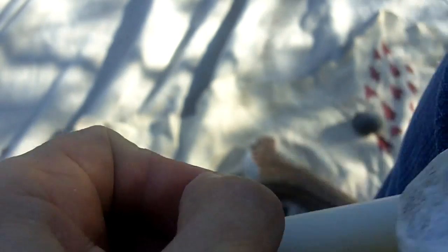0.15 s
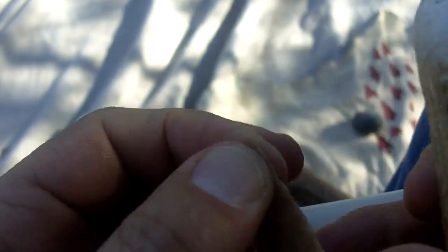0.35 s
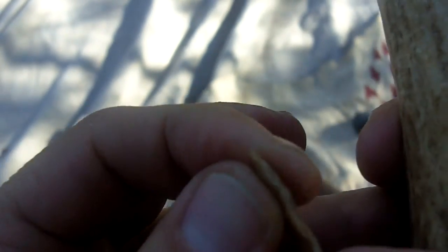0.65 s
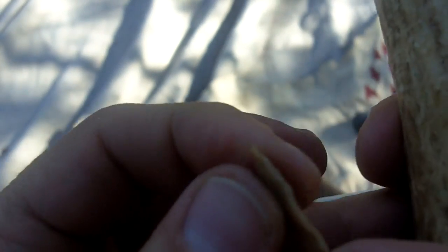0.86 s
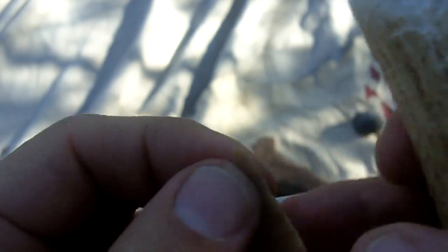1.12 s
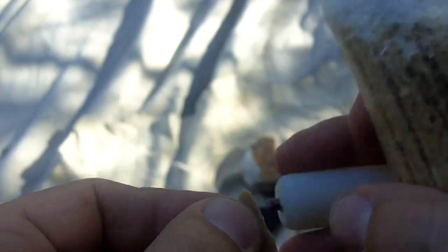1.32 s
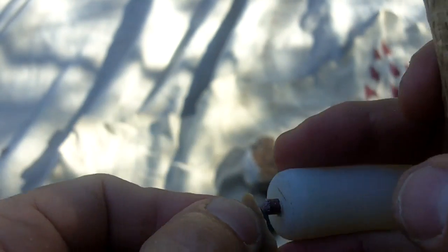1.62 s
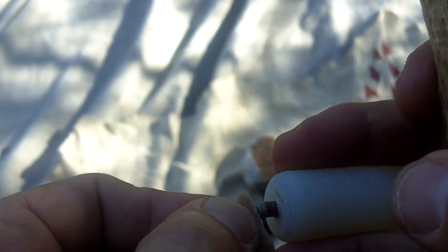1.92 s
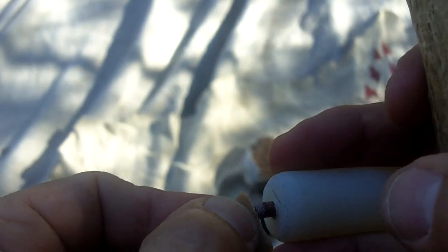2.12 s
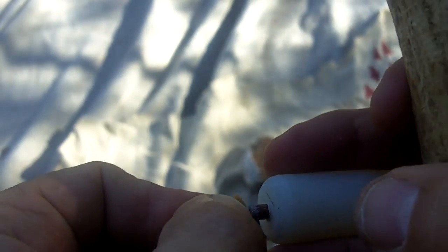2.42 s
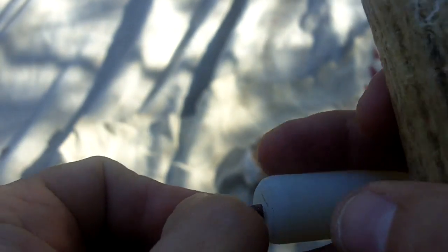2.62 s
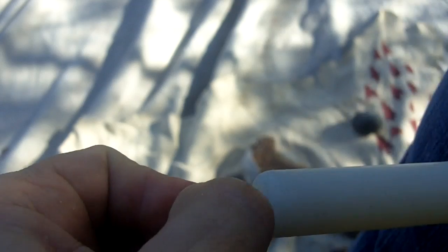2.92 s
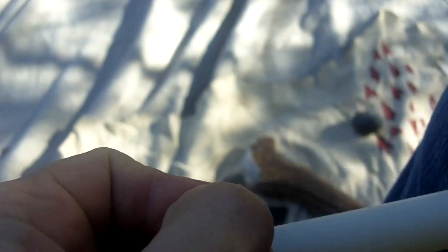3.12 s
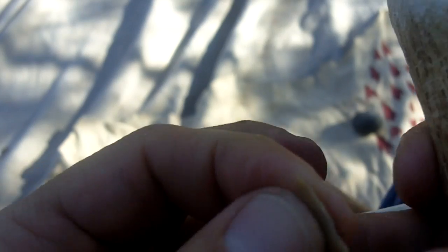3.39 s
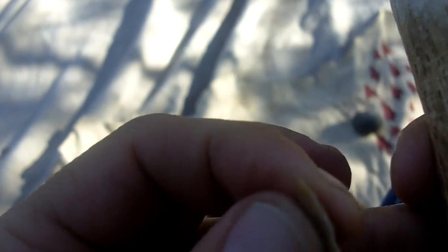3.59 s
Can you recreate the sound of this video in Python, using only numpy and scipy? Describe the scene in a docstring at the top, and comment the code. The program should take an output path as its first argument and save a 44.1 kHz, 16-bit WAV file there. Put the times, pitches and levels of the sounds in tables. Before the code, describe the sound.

A hard, dry knapping crack, then distant birdsong and wind buffeting, then a second, louder crack

```python
"""Flint knapping in a yard, under light wind that buffets the microphone: low-passed noise swelling in gusts.
An antler billet hits a punch set on a stone edge: noise cracks, damped sines ring, walls and trees answer.
Small birds then sing at a distance as gliding sines with a diffuse tail, and the gusts grow.
A second blow comes near the end; the billet rebounds once and a loose flake ticks as it lands.
The blows overload the recorder, whose gain dips and recovers."""
import sys
import numpy as np
from scipy import signal
from scipy.fft import rfft, irfft, next_fast_len
from scipy.io import wavfile
from scipy.ndimage import map_coordinates

SR = 44100
rng = np.random.default_rng(int(sys.argv[2]) if len(sys.argv) > 2 else 0)


def store_wav(level_fs):
    """Save 16-bit WAV to argv[1]."""
    pcm = np.round(np.clip(np.atleast_2d(level_fs), -1, 1) * 32767)
    wavfile.write(sys.argv[1], SR, pcm.T.astype(np.int16))


N = 165375
T = np.arange(N) / SR  # time [s]


def amp(db):
    """Amplitude ratio: 20 dB for each factor of ten."""
    return 10 ** (np.asarray(db) / 20)


def unit(x):
    """Normalisation: equal mean power, rms 1 over all channels."""
    return x / np.sqrt(np.mean(x ** 2) + 1e-20)


def along(points, hz):
    """Logarithmic frequency scale: (frequency, value) points are joined by lines on it."""
    f, v = np.transpose(points)
    return np.interp(np.log(hz + 1), np.log(f + 1), v)


def filtered(x, response):
    """Linear filtering: the spectrum is multiplied by a response of frequency."""
    size = next_fast_len(N + 8192)  # zero padding limits wrap-around
    spectrum = rfft(x, size) * response(np.fft.rfftfreq(size, 1 / SR))
    return irfft(spectrum, size)[..., :N]


def noise(spectrum, alike):
    """Interchannel coherence: independent mid and side noises, coloured and mixed to stereo of rms 1."""
    def mid_side_gains(hz):
        # half the angle whose cosine is the left-right correlation
        turn = np.arccos(np.clip(along(alike, hz), -1, 1)) / 2
        return amp(along(spectrum, hz)) * [np.cos(turn), np.sin(turn)]

    mid, side = filtered(rng.standard_normal((2, N)), mid_side_gains)
    return unit(np.array([mid + side, mid - side]))


def wobble(rate):
    """Slow random modulation: a smooth curve through random knots, rate of them a second."""
    knots = rng.standard_normal(int(N * rate / SR) + 4)
    return map_coordinates(knots, [T * rate])


def burst(start, attack, t60):
    """Exponential decay: a quick rise, then a fall of 60 dB in each t60."""
    t = np.maximum(T - start, 0)
    decay = np.exp(-np.minimum(np.log(1000) * t / t60, 50))
    return (1 - np.exp(-t / attack)) * decay


def pan(db):
    """Interchannel level difference: left minus right in dB, split evenly between the two."""
    return amp(np.array([[db], [-db]]) / 2)


def outdoor_air():
    """Ambient noise: steady broadband air over a distant low rumble."""
    # spectra of the air and of the distant rumble: (frequency [Hz], relative level [dB])
    air_spectrum = [(120, -36), (200, -3), (397, -3.5), (613, -2.5), (721, -5), (833, -3.5), (1110, -5.5),
                    (1220, -7.5), (1910, -11.5), (3870, -16.5), (15000, -23.5)]
    low_spectrum = [(20, 0), (60, -7), (130, -4), (220, -10.5), (500, -41)]
    # coherence of the diffuse field: (frequency [Hz], left-right correlation)
    air_coherence = [(60, 0.81), (180, 0.71), (550, 0.71), (1650, 0.85), (4970, 0.86), (15000, 1)]
    air_db, low_db = -54, -57
    air = amp(air_db) * noise(air_spectrum, air_coherence)
    return air + amp(low_db) * noise(low_spectrum, air_coherence)


def wind():
    """Turbulent pressure at the microphone: low-frequency noise whose level follows the gusts."""
    # course of the gusts: (time [s], buffeting level before the raise [dB])
    gust_course = [(.05, -57), (.4, -57), (.57, -51.5), (1.05, -62), (1.14, -42), (1.38, -54),
                   (1.585, -55.5), (1.63, -39), (1.72, -38), (1.8, -38), (1.86, -35), (2.0, -38.5),
                   (2.11, -29), (2.2, -38), (2.3, -34), (2.36, -40.5), (2.43, -37), (2.52, -38),
                   (2.56, -28.5), (2.63, -40), (2.8, -30), (3.0, -44), (3.17, -41), (3.26, -50),
                   (3.32, -36.5), (3.55, -37), (3.72, -43.5)]
    # spectrum of the buffeting: (frequency [Hz], relative level [dB])
    rumble_spectrum = [(12, -6.5), (25, 1), (40, -0.5), (60, -8.5), (100, -20.5), (160, -31.5), (300, -43),
                       (800, -71.5)]
    # coherence of the buffeting: (frequency [Hz], left-right correlation)
    wind_coherence = [(40, .62)]
    raise_db, flutter_db = 1.5, 1.8
    gust_db = np.interp(T, *np.transpose(gust_course)) + raise_db + flutter_db * wobble(12)
    return amp(gust_db) * pan(1.5) * noise(rumble_spectrum, wind_coherence)


def note(s, length, start_hz, end_hz, db, rough):
    """Frequency modulation: a sine glides evenly in pitch, its phase roughened."""
    u = np.clip((T - s) / length, 0, 1)
    phase = 2 * np.pi * np.cumsum(start_hz + (end_hz - start_hz) * u) / SR
    swell = np.sqrt(2 * np.abs(np.sin(np.pi * u)))
    return amp(db) * swell * np.sin(phase + rough)


def among_trees(x, wet_db):
    """Diffuse reverberation: convolution with decaying noise adds a scattered tail."""
    t60 = 0.34  # s
    t = T[:SR // 2]
    tail = rng.standard_normal((2, len(t))) * np.exp(-np.log(1000) * t / t60)
    tail = tail / np.linalg.norm(tail[0])
    return x + amp(wet_db) * signal.fftconvolve(x[None], tail, axes=1)[:, :N]


def warbles_and_slurs(flutter):
    """Two-part pitch contour: each warbled note rises, breaks and falls; single slurs glide once."""
    # warbled notes: (time [s], length [s], top pitch [Hz], end pitch [Hz], level of the fall before waver [dB])
    warble_notes = [(0.688, 0.052, 2485, 2300, -51), (0.761, 0.055, 2560, 2220, -53),
                    (0.838, 0.045, 2555, 2240, -49.5), (0.916, 0.059, 2560, 2160, -52),
                    (1, 0.052, 2690, 2130, -52.5), (1.074, .058, 2550, 2310, -51.5),
                    (1.545, 0.055, 2530, 2240, -56), (1.619, 0.053, 2644, 2330, -51.5),
                    (1.704, 0.048, 2680, 2340, -49.5), (1.785, 0.052, 2650, 2300, -51.5),
                    (1.864, 0.055, 2630, 2220, -55.5)]
    # slurred calls: (time [s], length [s], start pitch [Hz], end pitch [Hz], level before waver [dB])
    slur_notes = [(.63, 0.018, 2330, 2440, -55), (1.402, .02, 3500, 3140, -59.5),
                  (1.945, .03, 1680, 1790, -56), (2.185, .034, 2380, 2730, -55.5),
                  (2.214, .026, 2980, 3250, -62.5), (2.432, .026, 3000, 2080, -57.5),
                  (2.747, 0.024, 2900, 1920, -55.5), (3.588, .024, 2400, 1850, -59.5)]
    rise_share = .42  # of the note's length
    rise_gain, break_loss = 0.068, 0.061  # shares of the top pitch
    waver_db, waver_hz = 2, 70.2  # unsteady loudness
    rough = 0.32 * flutter  # radians
    calls = sum(note(*row, rough) for row in slur_notes)
    for s, length, top_hz, end_hz, db in warble_notes:
        rise_s = length * rise_share
        calls = calls + note(s, rise_s, top_hz * (1 - rise_gain), top_hz, db - 3.0, rough)
        calls = calls + note(s + rise_s, length - rise_s, top_hz * (1 - break_loss), end_hz, db, rough)
    return among_trees(calls * amp(waver_db * wobble(waver_hz) - 2.35), wet_db=-9.5)


def chirps(flutter):
    """Phase modulation: strong random flutter roughens the notes of a repeated phrase."""
    # repeats of the phrase: (time [s], relative level [dB])
    phrase_starts = [(.535, 1), (1.173, -1), (1.804, -3), (2.58, 0), (3.352, -1)]
    # notes: (time in phrase [s], length [s], start pitch [Hz], end pitch [Hz], level before trims [dB])
    phrase_notes = [(0, .02, 4400, 4150, -61.5), (.014, 0.032, 3850, 3580, -57.5),
                    (.082, 0.02, 4100, 3450, -55), (.099, 0.017, 3900, 3200, -59),
                    (.06, 0.13, 2850, 2820, -64.5)]
    rough = 1.35 * flutter  # radians
    song = sum(note(start + s, length, start_hz, end_hz, phrase_db + db, rough)
               for start, phrase_db in phrase_starts
               for s, length, start_hz, end_hz, db in phrase_notes)
    return among_trees(song * amp(-1.5), wet_db=-0.5)


def birds():
    """Superposition: one bird warbles in runs, another chirps a phrase, and slurs fall between."""
    flutter = wobble(348)
    return warbles_and_slurs(flutter) + chirps(flutter)


def chips():
    """Impact noise: a loose flake lands with a short burst of coloured noise."""
    # landings: (time [s], level [dB])
    landings = [(3.1225, -31.5)]
    # spectrum of the tick: (frequency [Hz], relative level [dB])
    chip_spectrum = [(500, -23.5), (1300, 8), (2200, -2), (3800, 0), (5000, -18), (15000, -28)]
    ticks = sum(amp(db) * burst(s, .0004, t60=0.012) for s, db in landings)
    return ticks * noise(chip_spectrum, [(1000, 0.84)])


def ring(k, s, length):
    """Modal synthesis: blow k sets the modes of punch and stone ringing as damped sines."""
    # (frequency [Hz], t60 before the blow's factor [s], left minus right [dB],
    #  relative level in the first blow [dB], in the second [dB], in the rebound [dB])
    modes = [(793, 0.019, 2, -25.5, -36.5, -38), (1135, .014, -4, -23, -20, -30.5),
             (1454, .018, -4, -22, -10.5, -12), (1830, .009, -4, -7, -20, -1),
             (2238, 0.0099, -2.5, -9, -11, 0), (2835, 0.0072, 0, -3, 1, -28),
             (3088, .009, 0.5, -13, -5.5, -18), (3368, .012, 1, -8, -8.5, -12.5),
             (3934, .011, -3.5, -17.5, -7.5, -9), (4466, .008, -3.5, -16, -21, -23),
             (4964, 0.0062, 5.5, -13.5, -18.5, -21), (5631, 0.0082, -11, 2, -5, -25),
             (7070, .009, -6.5, -27, -8, -23.5), (11240, 0.004, 0, 0, -18, -33)]
    attack_s, left_lag_s = 0.000587, .000015  # the left port's sines come later
    t = T - s - np.array([[left_lag_s], [0]])
    out = np.zeros((2, N))
    for m, (hz, t60, side_db, *levels) in enumerate(modes):
        sign = (-1) ** m  # neighbouring modes start in opposite phase
        envelope = burst(s, attack_s, t60 * length)
        out += sign * amp(levels[k]) * pan(side_db) * envelope * np.sin(2 * np.pi * hz * t)
    return out


def crack(s, db, length):
    """Broadband transient: the impact releases a very short burst of noise."""
    # spectrum of the crack: (frequency [Hz], relative level [dB])
    crack_spectrum = [(60, -19), (250, -14.5), (450, -16), (1100, -5), (3000, 3.5), (6000, -2.5),
                      (8500, -3), (11000, 6), (15000, -1.5)]
    t60 = 0.005 * length  # s
    return amp(db) * burst(s, 0.00018, t60) * noise(crack_spectrum, [(1000, .85)])


def thud(s):
    """Pressure pulse: the dull push of the billet swings once to each side of zero."""
    thud_db, thud_s = -20, 0.00056
    u = np.clip((T - s) / thud_s, 0, 50)
    return amp(thud_db) * u * (2 - u) * np.exp(-u)


def scattering(s):
    """Scattering and reflection: lap, tarp, ground, walls and foliage return the blow as decaying noise."""
    # spectra of the near scatter and of the yard: (frequency [Hz], relative level [dB])
    near_spectrum = [(100, -12.5), (400, -18), (800, -6.5), (2000, -7), (3300, 0.5), (4500, -5.5),
                     (5500, -2.5), (6600, -15.5), (15000, -19.5)]
    yard_spectrum = [(300, -26), (1200, -13.5), (2400, -4), (3000, -2.5), (3900, -2.5), (4600, -14),
                     (5500, -8), (6600, -22.5), (15000, -35)]
    # wall echoes: (delay [s], relative level [dB])
    wall_echoes = [(.055, -48), (.081, -57), (.095, -51), (.13, -55)]
    near_db, near_t60 = -19, 0.068
    ground_s, ground_db, ground_t60 = 0.0083, -25, .028
    foliage_db, grain_db, foliage_t60 = -47, 2, .62
    near = amp(near_db) * burst(s, .002, near_t60)
    near += amp(ground_db) * burst(s + ground_s, 0.0022, ground_t60)
    foliage = amp(foliage_db + grain_db * wobble(180)) * burst(s, .02, foliage_t60)
    walls = sum(amp(db) * burst(s + delay, 0.00089, t60=0.039) for delay, db in wall_echoes)
    return near * noise(near_spectrum, [(1000, .75)]) + (foliage + walls) * noise(yard_spectrum, [(1000, 0.69)])


def blows():
    """Impact excitation: each blow cracks, thuds and rings, and its surroundings scatter it."""
    # two blows and the rebound: (time [s], level [dB], crack relative level [dB], left minus right [dB],
    #  scattered sound relative level [dB], factor on the ring and crack t60)
    blow_list = [(.1935, 6.5, 0, 1.5, -3.5, 1.16), (3.0671, 10, -2, -4, -8, 0.85),
                 (3.0843, 2.5, -17, -2, -23, 0.67)]
    out = np.zeros((2, N))
    for k, (s, db, crack_db, pan_db, scatter_db, length) in enumerate(blow_list):
        direct = ring(k, s, length) + crack(s, crack_db, length) + thud(s)
        out += amp(db) * (pan(pan_db) * direct + amp(scatter_db) * scattering(s))
    return out


def scene():
    """Superposition: the air, the wind, the birds, the flake and the blows add."""
    return outdoor_air() + wind() + birds() + chips() + blows()


def record(dry):
    """Automatic gain control: gain ducks after loud peaks, too late to stop them clipping; then a band limit."""
    # constant offset of the (left, right) channel [full scale]
    dc_offset = [
        [.0388],
        [.0086],
    ]
    start_db, depth_db, release_db_per_s, attack_s = -7.5, 7, 21.5, 0.009
    top_hz = 15450
    peak_db = 20 * np.log10(np.clip(np.abs(dry).max(0), 1e-6, 1))
    over_db = np.maximum(peak_db - start_db, 0)
    # hold each peak, letting it fall at the release rate
    fall = release_db_per_s * T
    duck_db = np.minimum(np.maximum.accumulate(over_db + fall) - fall, depth_db)
    # a one-pole smoother delays the gain change
    pole = np.exp(-1 / (attack_s * SR))
    x = dry * amp(-signal.lfilter([1 - pole], [1, -pole], duck_db))
    x = x / (1 + np.abs(x) ** 8) ** (1 / 8)  # clipping with a rounded knee
    return filtered(x, lambda hz: 1 / np.sqrt(1 + (hz / top_hz) ** 120)) + dc_offset


dry = scene()
out = record(dry)
store_wav(out)
```